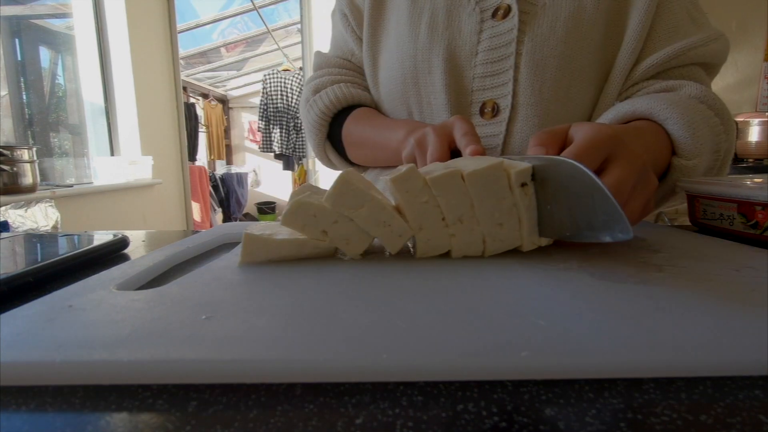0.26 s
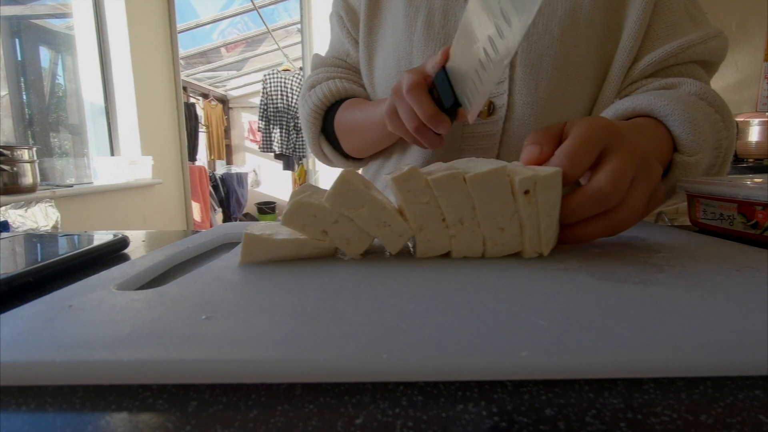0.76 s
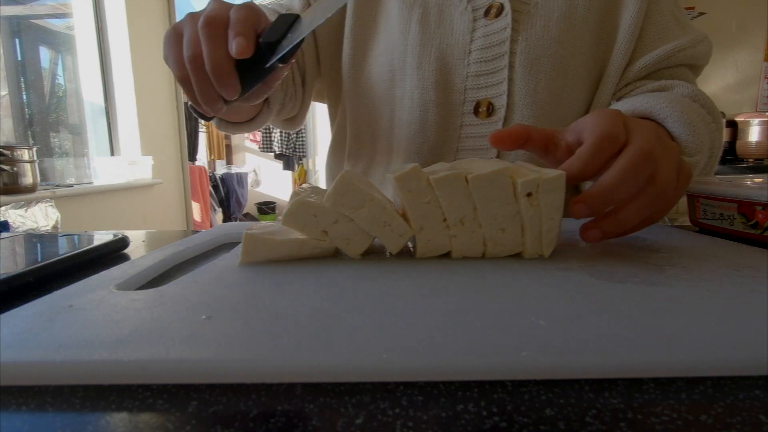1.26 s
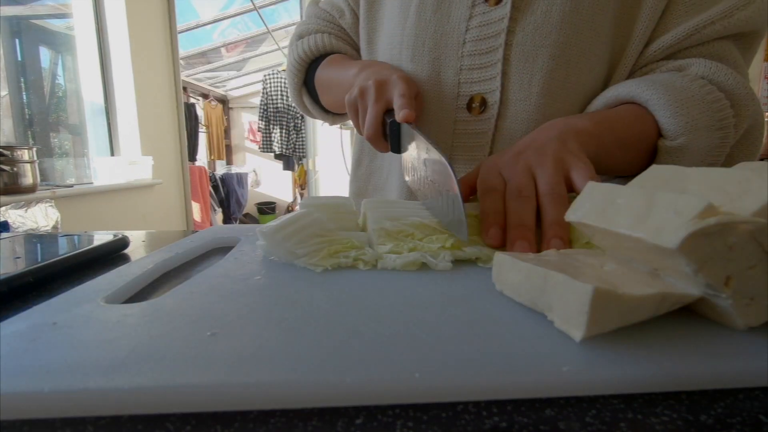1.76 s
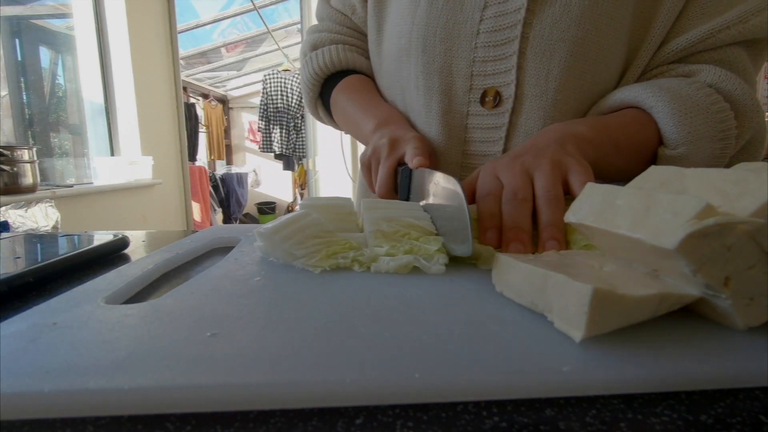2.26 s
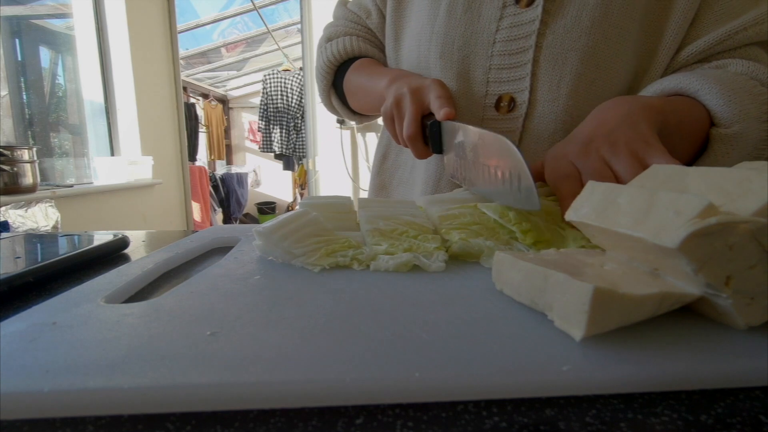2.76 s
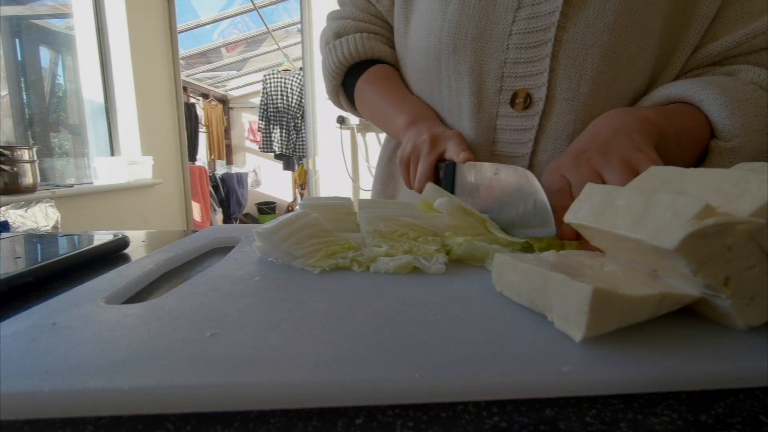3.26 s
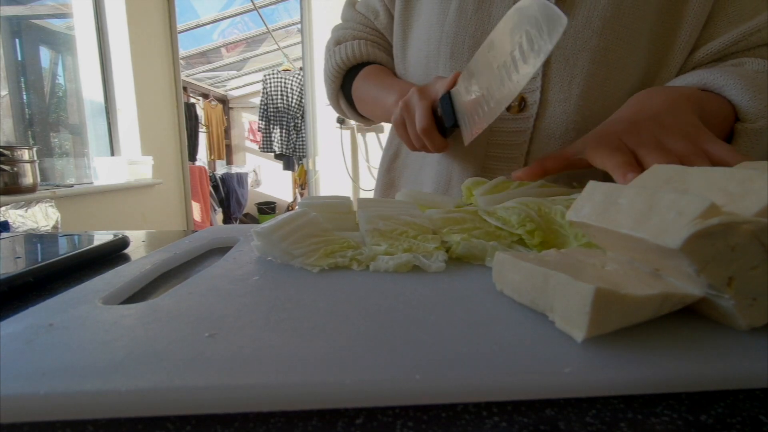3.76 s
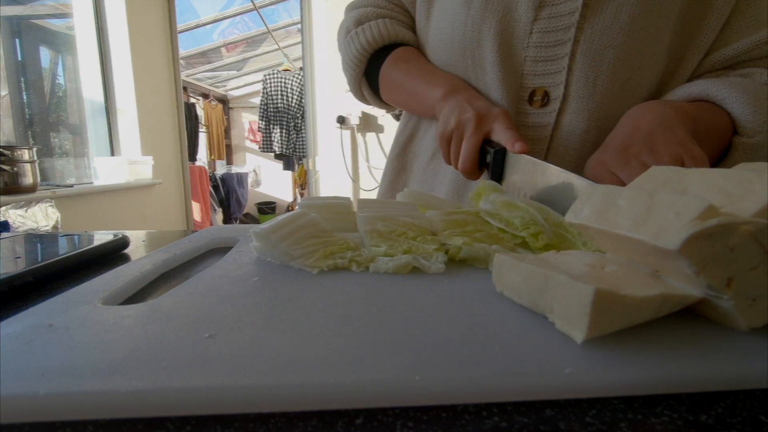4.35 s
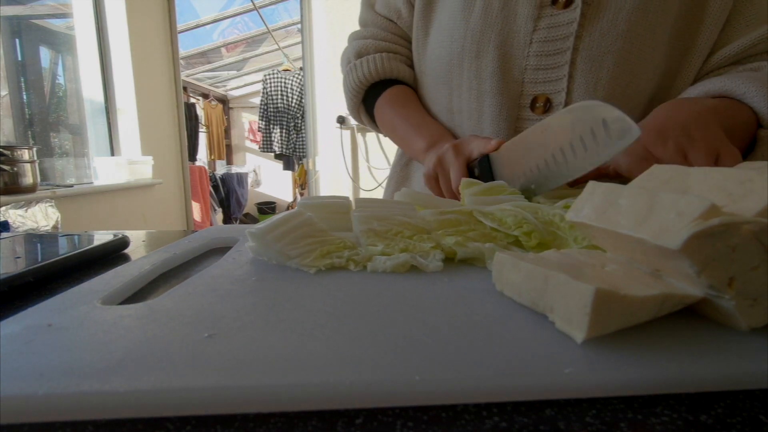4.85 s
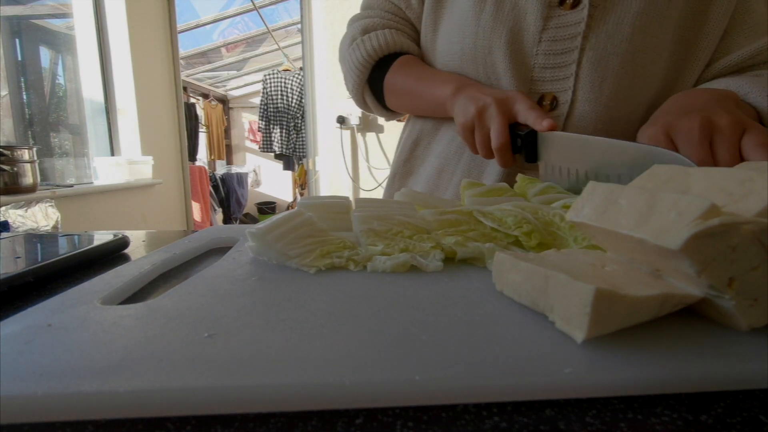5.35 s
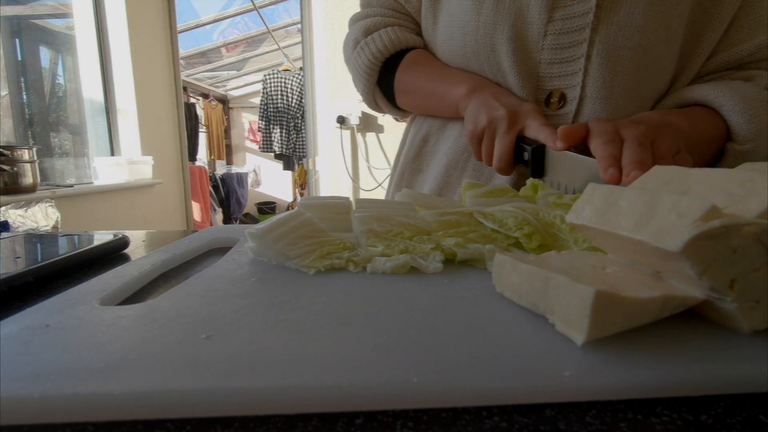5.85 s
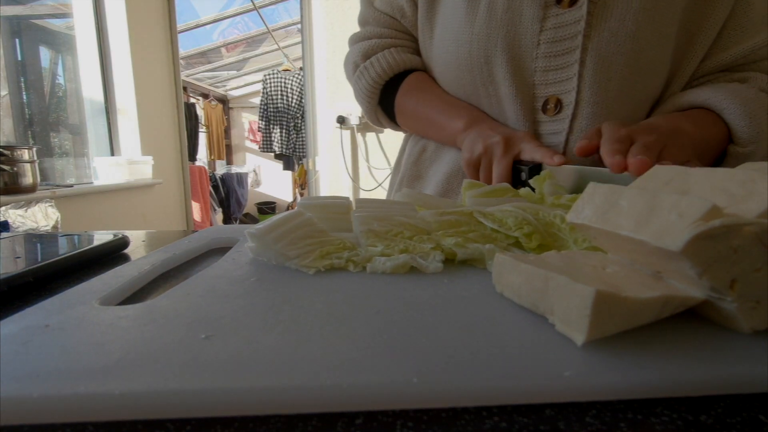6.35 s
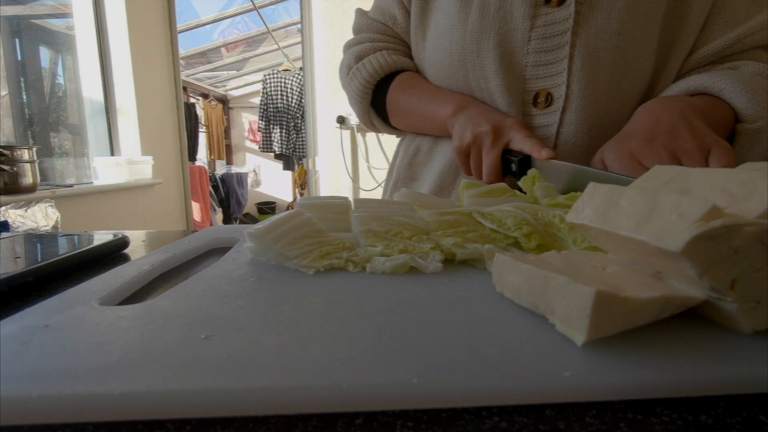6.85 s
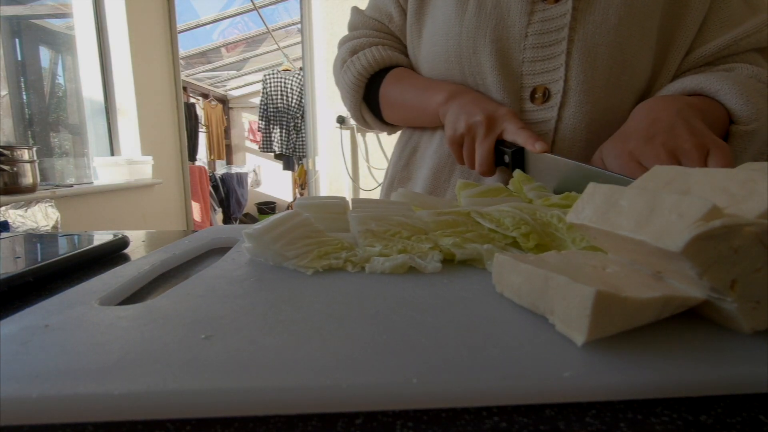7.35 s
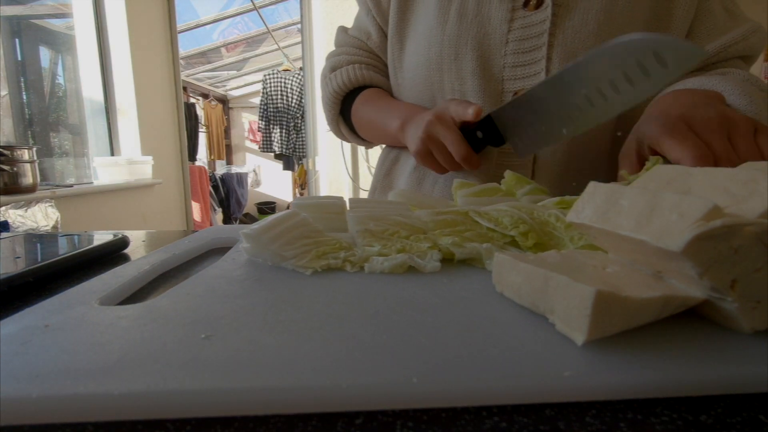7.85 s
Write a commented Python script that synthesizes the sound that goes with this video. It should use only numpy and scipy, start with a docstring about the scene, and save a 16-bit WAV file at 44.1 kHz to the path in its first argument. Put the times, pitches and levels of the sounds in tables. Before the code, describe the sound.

From 0 to 1.5 s a wide, low appliance drone around 200 Hz wavers with rumble and soft hiss, the rumble swelling near 1.2 s; leaf rustles are almost inaudible. At 1.5 s the room abruptly becomes quieter and narrower. From 1.8 to 2.3 s a knife crunches through cabbage close up: bright crackle, dull stalk snaps, board knocks and a faint wet squeak. A second cut at 3.0 to 3.4 s ends at 3.3 s in the loudest event, a hard, hollow, slightly overloaded knock. A third crunch at 4.2 to 4.5 s has a short squeak. Soft rustles follow, then a sharp knock at 5.84 s and a light crunchy cut at 6.05 to 6.2 s. Quiet rasping saw strokes run from 6.75 to 7.8 s. The low room tone widens and swells towards 8.1 s, with faint dull knocks.

```python
"""A kitchen knife cuts crisp leafy cabbage on a plastic board that lies on a worktop, heard close up in stereo.
Fibres crackle as coloured clicks and noise, stalks snap as short pitched bursts, knocks ring the modes of the board,
and later the blade saws in rasping strokes of regular slips. Wet leaves squeak as short gliding tones.
Behind it an appliance drones in filtered noise and wavering tones, with rumble and hiss.
After a second and a half the room tone turns quieter and narrows to the middle; near the end it widens again."""
import sys
import numpy as np
from scipy import signal
from scipy.fft import rfft, irfft
from scipy.io import wavfile

SR = 44100
rng = np.random.default_rng(int(sys.argv[2]) if len(sys.argv) > 2 else 0)


def transcribe(signal):
    """Save signal, clipped to [-1, 1], as a 16-bit WAV file at the path in sys.argv[1]."""
    frames = np.atleast_2d(signal).T
    limited = np.clip(frames, -1, 1)
    pcm = np.round(limited * 32767).astype(np.int16)
    wavfile.write(sys.argv[1], SR, pcm)


N = 357651   # samples


def from_db(db):
    """Gain for a level in dB."""
    return 10 ** (np.asarray(db) / 20)


def rms_one(x):
    """Scale to rms 1."""
    return x / np.sqrt(np.mean(x ** 2) + 1e-20)


def in_time(tables, silent=False):
    """Columns of one or more tables, sample by sample; outside the tables -120 if silent."""
    t = np.arange(N) / SR
    rows = np.concatenate(tables)
    columns = [np.interp(t, rows[:, 0], c) for c in rows[:, 1:].T]
    inside = sum((t >= table[0][0]) & (t <= table[-1][0]) for table in tables) > 0
    return [np.where(inside | (not silent), c, -120) for c in columns]


def colour(x, spectrum):
    """Causal (minimum-phase) filter with the given dB curve on a log axis; unit noise stays at rms 1."""
    hz, db = np.transpose(spectrum)
    size = 16384
    grid = np.maximum(np.arange(size // 2 + 1) * SR / size, 1)
    log_gain = np.interp(np.log(grid), np.log(hz), db) * np.log(10) / 20
    cepstrum = irfft(log_gain)
    # folding the cepstrum onto positive time makes the filter minimum-phase
    cepstrum[1:size // 2] *= 2
    cepstrum[size // 2 + 1:] = 0
    taps = irfft(np.exp(rfft(cepstrum)))[:size // 2]
    return signal.fftconvolve(x, taps / np.sqrt(np.sum(taps ** 2)))[:N]


def band(x, kind, hz, order=4):
    """Butterworth low- or high-pass."""
    return signal.sosfilt(signal.butter(order, hz, kind, fs=SR, output="sos"), x)


def drift(rate):
    """Slow chance: straight lines between normal random knots, about 2 * rate knots a second."""
    knots = int(N / SR * rate * 2) + 2
    return np.interp(np.arange(N), np.linspace(0, N, knots), rng.standard_normal(knots))


def ring(x, hz, t60):
    """A unit click sets a sine of starting height 1 ringing; it dies by 60 dB in t60 seconds."""
    r = from_db(-60 / (t60 * SR))
    w = 2 * np.pi * hz / SR
    return signal.lfilter([0, np.sin(w)], [1, -2 * r * np.cos(w), r * r], x + 1e-18)


def dying_noise(t60, length_s):
    """A burst of noise that fades out; energy 1."""
    t = np.arange(int(length_s * SR)) / SR
    burst = rng.standard_normal(len(t)) * from_db(-60 * t / t60)
    return burst / np.sqrt(np.sum(burst ** 2))


def during(start, end):
    """1 between two times, with 6 ms ramps."""
    t = np.arange(N) / SR
    return np.clip((t - start) / .006 + 1, 0, 1) * np.clip((end - t) / .006, 0, 1)


# Colours of the cutting layers: (f/Hz, relative level/dB)
TEAR_COLOUR = [(1240, -42), (2100, -1.5), (2340, -2.5), (2550, -2), (2790, -4), (3220, -11.5), (3740, -1.5),
               (4030, -6.5), (4420, -5.5), (5490, -9), (5920, -6), (6660, -11.5), (10700, -37.5),
               (12300, -27.5), (15500, -32.5)]   # bright crackle of torn leaves
SAW_COLOUR = [(1240, -42.5), (2100, 0.5), (2420, 3), (2630, 2.5), (3330, -4), (3560, 3.5), (5100, -2),
              (6230, -6.5), (11000, -47), (12500, -34), (15500, -30)]       # bright rasp of sawing
BODY_COLOUR = [(560, -25.5), (950, -3.5), (1110, 1.5), (1320, 3), (1690, 0.1), (2200, -10.5), (2700, -4.5),
               (3600, -30.5), (6000, -48.5)]      # duller body of the leaves
STALK_COLOUR = [(220, -30), (380, 2), (447, -2.5), (539, 3), (607, -2), (672, 3), (1050, -9), (1360, -38.5),
                (2310, -120)]    # low crunch of the stalks
TEAR_DB = -1   # gain on the steady tearing; separate snaps carry the peaks
KITCHEN_T60_S = 0.31


def cutting():
    """Torn and sawn fibres, snaps, board, knocks and squeaks sum, then excite the kitchen's short tail."""
    tearing_gains, sawing_gains = gestures()
    torn_noise, sawn_noise = fibres()
    torn = torn_noise * tearing_gains * from_db(TEAR_DB)
    sawn = sawn_noise * sawing_gains
    both = torn + sawn   # rows: crackle, body, stalks, board shake
    snap_bright, snap_body = snaps()
    crackle = colour(torn[0] + snap_bright, TEAR_COLOUR) + colour(sawn[0], SAW_COLOUR)
    body = colour(both[1] + from_db(-5) * snap_bright, BODY_COLOUR)
    stalks = colour(both[2] + snap_body, STALK_COLOUR)
    dry = crackle + body + stalks + board(both[3]) + knocks() + squeaks()
    tail = band(dying_noise(KITCHEN_T60_S, .8), "low", 6000, order=2)
    return dry + from_db(-13.0) * signal.fftconvolve(dry, tail)[:N]


# The blade pressed down through the stack, one table a cut:
# (t/s, crackle level/dB, weight of the stalks/dB over crackle, push on the board/dB over crackle)
CUT_PRESSES = [
    [(1.76, -71, -3, 11), (1.8, -54.5, -3, 8), (1.812, -47.5, -3, 13), (1.884, -35, -2, 8),
     (1.934, -57.5, 2, 13), (1.968, -31.5, 0, 8), (2.06, -32.5, -3.5, 8), (2.1, -39.5, 5, -1),
     (2.15, -36, -2.5, 1), (2.178, -25.5, -5.5, -10), (2.21, -45, 1.5, 12), (2.4, -69.5, -15, 10)],
    [(3.0, -56, -6, 3), (3.03, -55, -11, 5.5), (3.044, -41, -1.5, 5), (3.124, -43.5, -7, 18),
     (3.148, -34, -0.5, 7.5), (3.18, -32.5, -0.5, 3), (3.228, -37.5, -9, -2), (3.272, -29, 1.5, 13),
     (3.294, -24, 0, -3.5), (3.312, -40, 3.5, 15.5), (3.37, -48.5, 0.5, 24), (3.52, -71.5, -7, 24)],
    [(4.085, -78, -1, 18), (4.108, -51, -6, 7), (4.22, -46, -14, -8), (4.256, -39.5, -7, 1.5),
     (4.324, -45, -3, 5), (4.346, -26.5, -4.5, 13), (4.378, -29, 10, -2), (4.42, -42, 2.5, 10),
     (4.49, -33.5, 2, -1), (4.512, -38.5, 0, 15), (4.54, -50, 0, 15), (4.66, -68.5, -8, 10)],
    [(5.69, -57.5, -3, 9), (5.718, -55.5, -9, 2), (5.74, -59, -7.5, 15), (5.755, -49, -1.5, 1),
     (5.8, -58, 1, -8), (5.83, -40.5, 8, 8), (5.842, -28, 10, 10), (5.86, -37, 16.5, 1), (5.91, -49, 6, 6),
     (6.005, -66, 17, 6)],
    [(6.01, -58, 11, 6), (6.032, -50, -3, -8), (6.046, -37.5, 4.5, -10), (6.1, -41.5, -8, 5.5),
     (6.136, -30.5, 0.5, 6.5), (6.168, -39.5, -1.5, 2), (6.19, -44.5, -1, 13), (6.37, -84, -3, 13.5)],
]
# Leaves and hands shifting on the board:
# (start t/s, length/s, crackle level/dB, weight/dB over crackle, growth over the length/dB)
LEAF_RUSTLES = [(0.13, .07, -68, -11, -8), (0.213, 0.078, -70.5, -1, -11), (1.084, 0.12, -72, 4, -2),
                (1.151, 0.13, -67.5, 0, -5), (2.421, 0.15, -64.5, -1.5, -6), (2.701, 0.24, -62, -2.5, 9),
                (2.888, 0.17, -57.5, -10, -6), (3.528, 0.17, -58, -2.5, 0), (3.929, 0.19, -60.5, -6, 2),
                (4.63, 0.34, -59, -5, 8.5), (5.364, 0.37, -55, -13, -9), (6.442, 0.13, -77, 30, 6),
                (6.694, 0.63, -65, -2, -1), (7.547, 0.71, -71, -4.5, -17)]
RUSTLE_RISE_SHARE, RUSTLE_FALL_SHARE = .2, .35   # shares of the length
RUSTLE_PUSH_DB, PUSH_PER_WEIGHT = 9.5, 1.1       # push at weight 0 dB; dB of push per dB of weight
# Sawing strokes, the blade sticks and slips:
# (start t/s, length/s, rasp level/dB, weight/dB over rasp, growth/dB, mean slips per s at mid-stroke,
#  share of regular slips 0-1)
SAW_STROKES = [(6.748, .2, -54, -2.5, 10.5, 144, 0.28), (6.952, .19, -55, -5, -1, 190, 0.3),
               (7.13, .27, -49, -1.5, 4, 180, 0.26), (7.3, 0.35, -52.5, -0.5, 3, 205, 0.17),
               (7.696, 0.15, -56.5, -15, -13, 165, 0.1)]
STROKE_RISE_SHARE, STROKE_FALL_SHARE = 0.38, .3  # shares of the length
STROKE_PUSH_DB, SAWN_BODY_DB = 7, 5              # push over rasp; extra leaf body while sawing


def gestures():
    """Layer gains over time: pressing and rustling drive the tearing, strokes drive the sawing."""
    tearing = layers(*in_time(CUT_PRESSES, silent=True))
    sawing = np.zeros((4, N))
    for s, length, db, weight_db, growth_db in LEAF_RUSTLES:
        levels = layers(db, weight_db, RUSTLE_PUSH_DB + PUSH_PER_WEIGHT * weight_db)
        add_gesture(tearing, levels, s, length, RUSTLE_RISE_SHARE, RUSTLE_FALL_SHARE, growth_db)
    for s, length, db, weight_db, growth_db, _, _ in SAW_STROKES:
        levels = layers(db, weight_db, STROKE_PUSH_DB) * from_db([0, SAWN_BODY_DB, 0, 0])
        add_gesture(sawing, levels, s, length, STROKE_RISE_SHARE, STROKE_FALL_SHARE, growth_db)
    return tearing, sawing * from_db(1.8 * drift(40))   # the hand does not press evenly


# What the weight brings out: (level/dB over crackle at weight 0, share of the weight added)
BODY_FROM_WEIGHT = (-1.5, .4)
STALK_FROM_WEIGHT = (-2.5, .95)


def layers(crackle_db, weight_db, push_db):
    """One effort of the blade as gains of crackle, leaf body, stalks and board shake; weight favours the lows."""
    body_db, stalk_db = (db + share * weight_db for db, share in (BODY_FROM_WEIGHT, STALK_FROM_WEIGHT))
    return from_db(crackle_db) * from_db([np.zeros_like(push_db), body_db, stalk_db, push_db])


def add_gesture(gains, levels, start, length, rise_share, fall_share, growth_db):
    """Add one gesture to the layer gains: it rises, grows or sinks to its end, falls."""
    at = round(start * SR)
    done = np.linspace(0, 1, round(length * SR))
    edges = np.clip(done / rise_share, 0, 1) * np.clip((1 - done) / fall_share, 0, 1)
    shape = (edges ** 2 * from_db(growth_db * (done - .5)))[:N - at]
    gains[:, at:at + len(shape)] += levels[:, None] * shape


SLIP_DIES_IN = .25   # share of a slip's cycle in which it falls to 1/e


def fibres():
    """Tearing is clumped clicks that ring a few cycles, on bursting noise; sawing is smoother; each rms 1."""
    # clumped clicks of random size and sign
    sizes = from_db(2.7 * np.minimum(rng.exponential(1, N), 4)) * rng.choice([-1, 1], N)
    clicks = sizes * (rng.random(N) < 3000 * from_db(5.0 * drift(60)) / SR)
    # each click bursts a cell of one of 18 pitches
    pitches = np.geomspace(900, 9000, 18)
    dealt = rng.integers(0, 18, N)
    cells = sum(ring(clicks * (dealt == k), hz, 20.0 / hz) * np.sqrt(hz) for k, hz in enumerate(pitches))
    cells = rms_one(cells)
    noise = rng.standard_normal(N)
    # small ribs give way at once, then settle
    ribs = np.minimum(rng.exponential(1, N), 2) * (rng.random(N) < 120 / SR)
    bursts = 1.3 + signal.lfilter([1], [1, -from_db(-60 / (.025 * SR))], ribs)
    torn = rms_one(rms_one(clicks) + 0.87 * noise + .5 * cells) * bursts
    return rms_one(torn), rms_one(stick_slip(noise + 0.21 * cells))


def stick_slip(grain):
    """The sawing blade sticks and slips: each cycle opens with a jerk and a puff of grain that dies away."""
    mid_strokes = [(s + length / 2, per_s, share) for s, length, *_, per_s, share in SAW_STROKES]
    per_s, share = in_time([mid_strokes])
    share = np.clip(share, 0, 1)
    phase = np.cumsum(per_s * (1 + .025 * drift(30))) / SR % 1
    puffs = rms_one(np.exp(-phase / SLIP_DIES_IN))
    jerks = rms_one(np.diff(phase, prepend=0) < 0)
    return rms_one(grain) * (1 - share + share * puffs) + 1.55 * share * jerks


# Stalks snapping: (t/s, relative level/dB, stalk level/dB over crackle, pitch f/Hz)
STALK_SNAPS = [(1.8148, -26.5, 2, 1520), (1.8482, -21.5, -4, 2300), (1.8702, -23, 2, 1190),
               (1.952, -32, -21, 1400), (1.9669, -28.5, 9, 918), (1.9919, -15, -21.5, 930),
               (2.0158, -33.5, -16, 1300), (2.0343, -15, -18, 2600), (2.0537, -22, -12, 2300),
               (2.1276, -16, -25, 2320), (2.173, -17.5, 5, 1580), (2.2887, -38, -19, 1700),
               (2.4618, -40.5, -8.5, 923), (2.7896, -37, -26, 960), (2.83, -38.5, -13.5, 935),
               (2.9317, -37, -5, 930), (3.0434, -19.5, -7, 1400), (3.0859, -20, -5, 1290),
               (3.1064, -21, -2, 990), (3.1398, -14.5, 2.5, 1990), (3.1482, -19, 1, 1650),
               (3.1847, -14, -13.5, 1790), (3.1935, -17, -14, 1773), (3.2211, -26, -21.5, 1420),
               (3.242, -16, -4, 1800), (3.2735, -23.5, -22, 1480), (3.2889, -8.5, -0.5, 1500),
               (3.5399, -39, 0, 2200), (3.9729, -39, -31, 1410), (4.1121, -32, -27.5, 1510),
               (4.1994, -33, -19.5, 1490), (4.2474, -29.5, -26.5, 1420), (4.3405, -27, -2, 1450),
               (4.4478, -24, 3, 3560), (4.4614, -20, -12, 1180), (4.7356, -52.5, 11, 910),
               (5.465, -37.5, -7, 2080), (5.5214, -35, -15.5, 1760), (5.7139, -44.5, -6.5, 4120),
               (5.7513, -27.5, -5, 1390), (5.8272, -29.5, 7.5, 940), (6.0437, -23.5, -7, 1370),
               (6.0701, -22.5, -15, 1480), (6.1225, -22, -17, 1500), (6.134, -28, -20, 1690),
               (6.3769, -49, -10, 910), (7.1651, -46, -17, 1180), (7.3622, -38, -6, 1920),
               (7.4036, -43, -18, 1480)]
SNAP_T60_S = .019


def snaps():
    """Each snap is a short burst with a brief pitch of its own; returns its bright and its duller part."""
    bright, body = np.zeros(N + SR), np.zeros(N + SR)
    t = np.arange(SR // 8) / SR
    for s, db, body_db, hz in STALK_SNAPS:
        burst = rng.standard_normal(len(t)) * from_db(db - 7.5 - 60 * t / SNAP_T60_S)
        burst += from_db(-22.5) * ring(burst, hz, 24.0 / hz)
        at = round(s * SR)
        bright[at:at + len(t)] += burst
        body[at:at + len(t)] += burst * from_db(body_db)
    return bright[:N], body[:N]


# Blade or hand on the board: (t/s, relative level/dB, contact/ms before 3 samples are added,
#  high-pass f/Hz, freedom to ring as a factor on t60, sharpness/dB per octave)
BOARD_KNOCKS = [(1.878, -8.5, 5.1, 88, 1.6, -2.5), (1.977, -14.5, 1.48, 99, 0.98, 4.5),
                (2.19, -3, 4.6, 88, 1.01, -0.5), (3.09, -30, 3.5, 99, 1.1, 9),
                (3.2953, 12, 1.57, 121.7, 0.61, 1.86), (3.3081, -9.5, 1.57, 100.8, 0.51, -9),
                (4.258, -24, 2.1, 120.7, 0.74, 2.5), (4.375, -7.5, 0.83, 141, 0.96, -0.2),
                (4.509, -11, 3.2, 79, 0.51, 4), (5.262, -35, 2.7, 121.7, 0.51, -11),
                (5.8391, -1, 0.48, 160, 0.67, 3.5), (6.452, -23.5, 0.73, 139, 1.6, -8),
                (7.95, -24.5, 8, 60, .8, -4), (8.03, -30, 4.3, 70, 0.75, -4)]
# Modes of the board on the worktop: (f/Hz, relative level/dB, t60/s at freedom 1)
BOARD_MODES = [(122.8, -8, 0.47), (182.1, 1, 0.28), (205.4, 3.5, 0.21), (274, -8.5, 0.26), (351, -2, 0.11),
               (405.7, -5, 0.26), (492, -6, 0.22), (559.3, 0, 0.15), (659, -5, 0.16), (740, -1.5, 0.21),
               (858, -19, 0.25), (900, -10.5, 0.185), (981, -19.5, 0.39), (995, -16.5, 0.045),
               (1180, -24.5, 0.26), (1410, -17, 0.062), (1490, -14.5, .12), (1650, -15, 0.15),
               (1860, -11, 0.098), (2140, -23, 0.12), (2320, -2.5, .06), (2660, -5.5, 0.096),
               (2820, -18, 0.018), (3400, -18, .04)]


def knocks():
    """Each knock is a smooth force pulse on all modes: long contacts miss the high ones, light ones the low ones."""
    out = np.zeros(N + SR)
    t = np.arange(SR // 2) / SR
    hz, mode_db, t60 = (c[:, None] for c in np.transpose(BOARD_MODES))
    spread_db = rng.normal(0, 1.5, (len(BOARD_KNOCKS), len(BOARD_MODES), 1))
    for knock, chance_db in zip(BOARD_KNOCKS, spread_db):
        s, db, contact_ms, lowest_hz, free, tilt_db = knock
        first_swing = from_db(-60 * t / (0.44 * t60 * free))   # dies fast
        after_ring = from_db(-7.0 - 60 * t / (t60 * free))
        height = from_db(db + mode_db - 12.5 + chance_db + tilt_db * np.log2(hz / 200))
        modes = height * (first_swing + after_ring) * np.sin(2 * np.pi * hz * t)
        force = np.hanning(int(contact_ms * SR / 1000) + 3)
        swing = np.convolve(np.sum(modes, axis=0), force / force.sum())
        at = round(s * SR)
        out[at:at + len(swing)] += band(swing, "high", max(lowest_hz, 30), order=3)
    return out[:N]


def board(shake):
    """Tearing shakes the board's modes below 450 Hz, which die faster than after a knock."""
    low = [mode for mode in BOARD_MODES if mode[0] < 450]
    out = np.zeros(N)
    for k, (hz, db, t60) in enumerate(low):
        out += (-1) ** k * from_db(db) * ring(shake, hz, 0.33 * t60)
    return from_db(-28) * out


# Wet leaves squeaking on the blade: (start t/s, end t/s, start f/Hz, end f/Hz, relative level/dB)
LEAF_SQUEAKS = [(2.117, 2.215, 2150, 1995, -41.5), (2.27, 2.34, 1754, 1630, -56),
                (4.355, 4.389, 1438, 1575, -25.5), (6.041, 6.103, 1416, 1544, -36.5),
                (6.112, 6.168, 1650, 1510, -36)]


def squeaks():
    """A gliding tone, roughened by fast chance, under a smooth swell."""
    out = np.zeros(N)
    rough = rms_one(drift(130))
    for start, end, start_hz, end_hz, db in LEAF_SQUEAKS:
        a, b = round(start * SR), round(end * SR)
        phase = 2 * np.pi * np.cumsum(np.linspace(start_hz, end_hz, b - a)) / SR
        swell = from_db(db + 6.0) * np.sqrt(np.hanning(b - a))
        out[a:b] += swell * np.sin(phase) * rough[a:b]
    return out


SHIFT_S = 1.483   # the room tone shifts from its early to its late colours here
# Room tone before wavering: (t/s, rumble level/dB, drone level/dB)
ROOM_LEVELS = [(0.0, -43, -45.5), (0.6, -44, -43.5), (1.08, -35, -42.5), (1.2, -32, -40.5),
               (1.46, -40.5, -41.5), (1.5, -54, -54), (2.5, -64, -59.5), (2.95, -57.5, -49),
               (3.75, -68.5, -58.5), (4.2, -57, -49.5), (4.88, -57, -59.5), (5.05, -49.5, -51),
               (5.4, -58.5, -54.5), (5.7, -49.5, -48.5), (6.35, -52, -52), (7.4, -64.5, -50),
               (7.85, -51, -50), (7.95, -42, -47.5), (8.11, -38, -44.5)]
# Colours of the room layers: (f/Hz, relative level/dB)
RUMBLE_COLOUR = [(12, -22), (20, -8.5), (38, -4), (49, -3), (58, -4.5), (68, -12.5), (90, -38.5),
                 (180, -85.5)]
DRONE_EARLY_COLOUR, DRONE_LATE_COLOUR = [(45, -43), (75, -17), (125, -2.5), (200, 4.5), (280, -7),
                                         (330, -15.5), (430, -24), (700, -49), (1200, -47)], [(45, -37.5), (80, -27.5), (130, -15.5),
                                                              (200, -3.5), (270, -13), (390, -23.5),
                                                              (520, -39.5), (700, -36.5), (1200, -76.5)]
HISS_EARLY_COLOUR, HISS_LATE_COLOUR = [(290, -32), (500, -4), (569, -22), (620, 0.5), (827, 1),
                                       (1100, -7.5), (3280, -18), (4130, -18.5), (7240, -18), (11000, -24),
                                       (15500, -29)], [(290, -35.5), (500, -5), (517, -15.5), (634, -4),
                                                           (909, -8.5), (1040, -10.5), (1910, -19.5),
                                                           (2090, -17.5), (2190, -26.5), (3400, -32),
                                                           (3640, -22.5), (4120, -13), (5910, -15),
                                                           (6690, -19.5), (7400, -42.5), (9620, -75.5),
                                                           (16300, -120)]
HISS_TOP_COLOUR = [(4000, -35.5), (6800, -5.5), (6990, -15.5), (8160, -9), (11600, -18.5), (12500, -8),
                   (15500, -14.5)]      # extra treble after the shift
ROOM_SIDE_COLOUR = [(15, -26), (25, -26), (116, -16.5), (204, -1.5), (297, -10.5), (433, -20), (567, -22),
                    (782, -15), (1020, -25), (1380, -28.5), (2630, -41), (4040, -52), (6380, -42),
                    (10400, -52.5), (15500, -55)]    # the wide part of the room
# Hiss: (early level/dB, mean late level/dB, late treble level/dB)
HISS_LEVELS = (-64, -65.5, -78)
# Motor lines: (f/Hz, width of the skirt/Hz, early level/dB over drone noise, late level/dB over drone noise)
MOTOR_LINES = [(97.2, 3.4, -2.5, -13), (150.4, 8.4, -10.5, -7), (193.1, 3.5, 0, -0.5),
               (248, 3.9, -20, -20.5), (298.3, 8, -6.5, -9)]
# Faint narrow tones after the shift: (f/Hz, width/Hz, mean level/dB)
WHINE_TONES = [(825, 60, -72), (1920, 18, -87.5), (2210, 32, -87)]
# Stretches where the room is heard wide: (start t/s, end t/s, mean side level/dB)
WIDE_ROOM_SPANS = [(0, 1.483, -46), (1.483, 2.28, -76), (7.658, 8.2, -54)]
SIDE_LEAN = -0.18   # share of rumble and drone put on the side in the first and last span; negative leans right
RUMBLE_WAVER_DB, DRONE_WAVER_DB = 1.5, 1.5


def room_tone():
    """Rumble, an appliance drone with wavering motor lines, and hiss, all from noise; returns mid and side."""
    rumble_db, drone_db = in_time([ROOM_LEVELS])
    early = during(0, SHIFT_S)
    late = 1 - early
    white = rng.standard_normal((5, N))
    rumble = rms_one(colour(white[0], RUMBLE_COLOUR))
    drone = early * colour(white[1], DRONE_EARLY_COLOUR) + late * colour(white[1], DRONE_LATE_COLOUR)
    for hz, width_hz, early_db, late_db in MOTOR_LINES:
        drone += motor_line(hz, width_hz) * from_db(early * early_db + late * late_db)
    early_gain, late_gain, top_gain = from_db(HISS_LEVELS)
    late_hiss = late_gain * colour(white[2], HISS_LATE_COLOUR) * from_db(2.0 * drift(2.165))
    late_hiss += top_gain * colour(white[4], HISS_TOP_COLOUR)
    for hz, width_hz, db in WHINE_TONES:
        late_hiss += from_db(db + 1.2 * drift(0.88)) * narrow_noise(hz, width_hz)
    hiss = late * late_hiss + early * early_gain * colour(white[2], HISS_EARLY_COLOUR)
    lows = from_db(rumble_db + RUMBLE_WAVER_DB * drift(6.1)) * rumble
    lows += from_db(drone_db + DRONE_WAVER_DB * drift(9.3)) * drone
    wide = sum(during(start, end) * from_db(db) for start, end, db in WIDE_ROOM_SPANS)
    side = wide * colour(white[3], ROOM_SIDE_COLOUR) * from_db(1.5 * drift(5))
    side += SIDE_LEAN * lows * (early + during(*WIDE_ROOM_SPANS[-1][:2]))
    return lows + hiss, side


def motor_line(hz, width_hz):
    """A tone of steady pitch and wavering level, with a noisy skirt; rms 1."""
    tone = np.sqrt(2) * np.sin(2 * np.pi * (hz * np.arange(N) / SR + rng.random()))
    return rms_one(tone * from_db(1.9 * drift(3)) + 0.73 * narrow_noise(hz, width_hz))


def narrow_noise(hz, width_hz):
    """Noise through one resonance: a wavering tone of rms 1."""
    return rms_one(ring(rng.standard_normal(N), hz, np.log(1000) / (np.pi * width_hz)))


# Stretches where the lows of the cutting are wide: (start t/s, end t/s, side level/dB over cutting, top f/Hz)
WIDE_CUT_SPANS = [(1.8, 1.917, -21, 935), (1.952, 2.257, -26, 474)]
TREBLE_SPREAD_HZ = 11200   # above this the two sides are nearly unrelated


def scene():
    """Mid and side of all sources, turned into left and right."""
    cut = cutting()
    room, side = room_tone()
    mid = room + cut
    scattered = signal.fftconvolve(cut, dying_noise(.02, .03))[:N]
    for start, end, db, top_hz in WIDE_CUT_SPANS:
        side += from_db(db) * during(start, end) * band(scattered, "low", top_hz)
    # the treble of the cutting, and of the late room, gets a side of similar loudness with new fine detail
    treble = band(cut + room * during(SHIFT_S, 9), "high", TREBLE_SPREAD_HZ, order=10)
    side += from_db(-0.5) * band(treble * rms_one(drift(1200)), "high", TREBLE_SPREAD_HZ, order=10)
    return np.array([mid + side, mid - side])


TOP_STOP_HZ = 15860   # from here up the sound is 60 dB down


def record(dry):
    """The hardest knocks overload the input and clip; then a steep low-pass cuts the top."""
    steep = signal.cheby2(16, 60, TOP_STOP_HZ, fs=SR, output="sos")
    overloaded = np.clip(dry, -.97, .97)
    return np.clip(signal.sosfilt(steep, overloaded), -1, 1)


dry = scene()
out = record(dry)
transcribe(out)
```